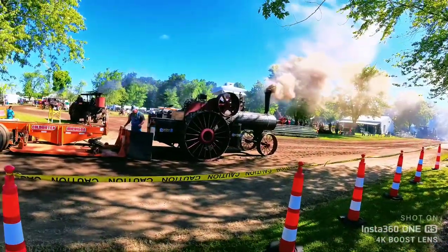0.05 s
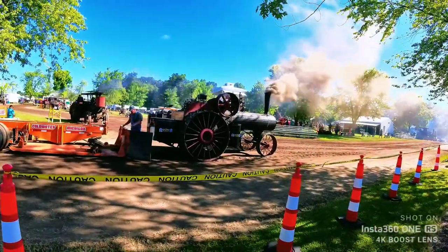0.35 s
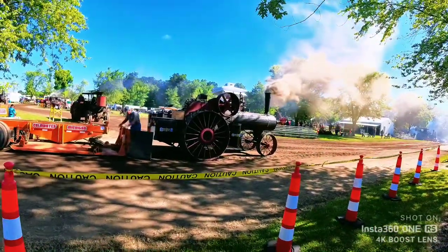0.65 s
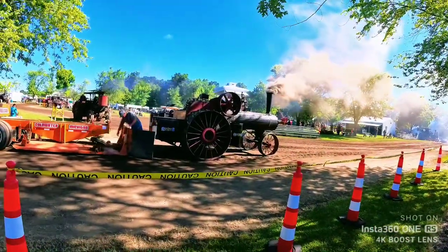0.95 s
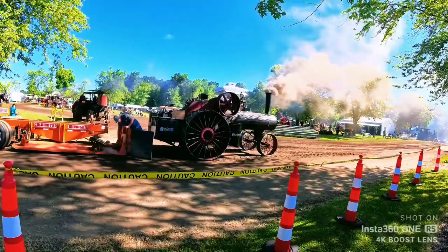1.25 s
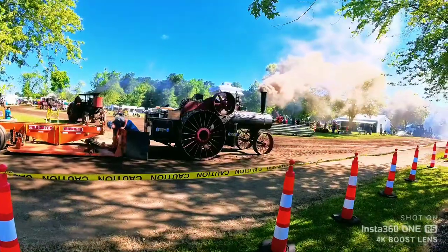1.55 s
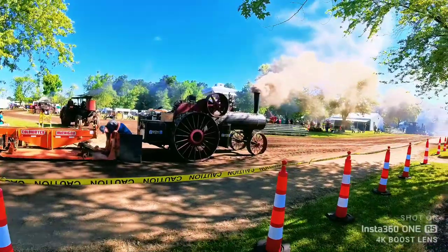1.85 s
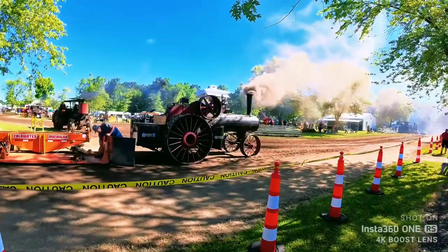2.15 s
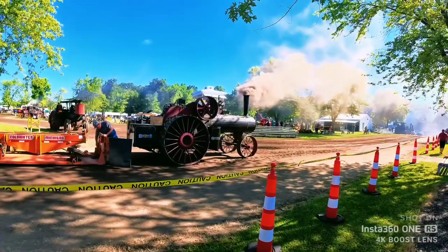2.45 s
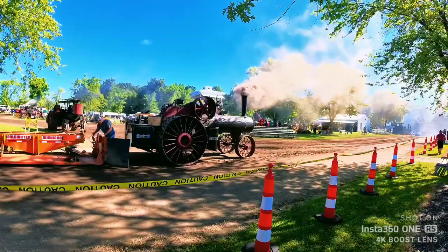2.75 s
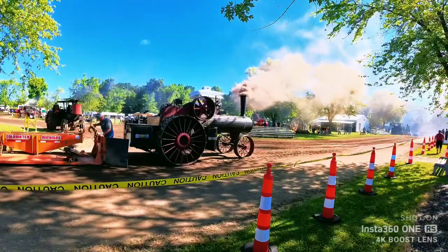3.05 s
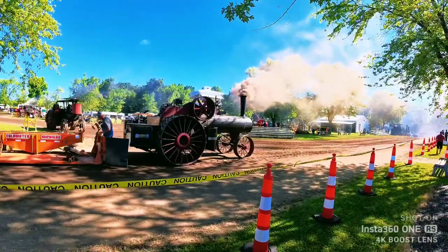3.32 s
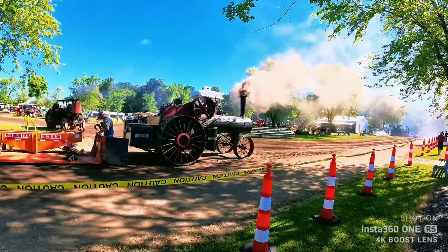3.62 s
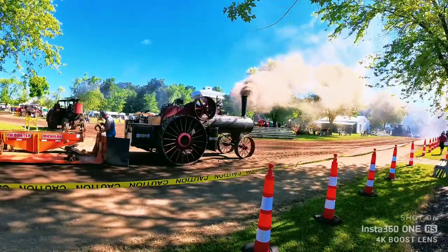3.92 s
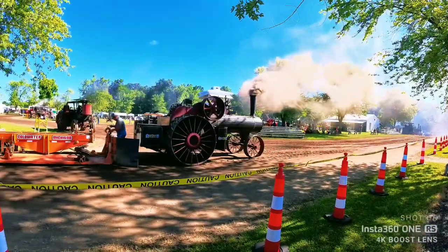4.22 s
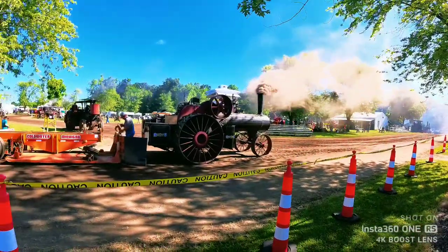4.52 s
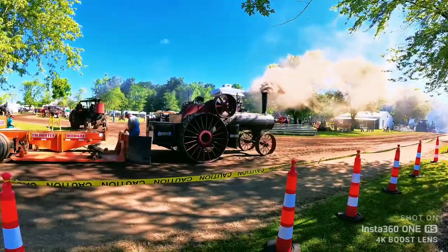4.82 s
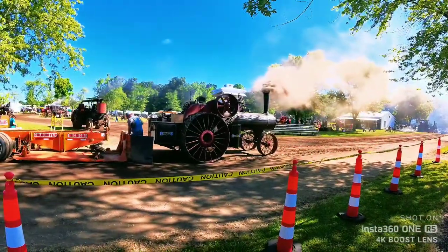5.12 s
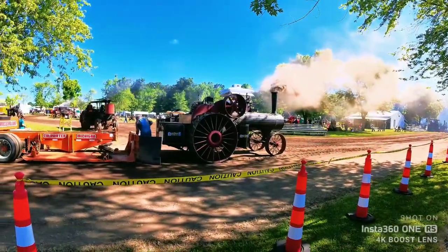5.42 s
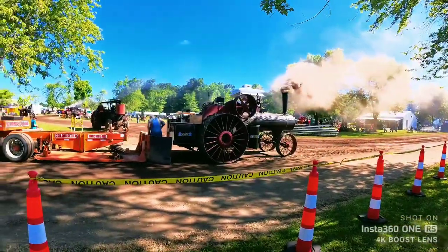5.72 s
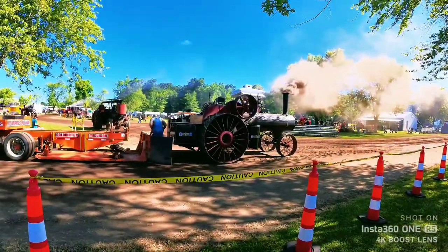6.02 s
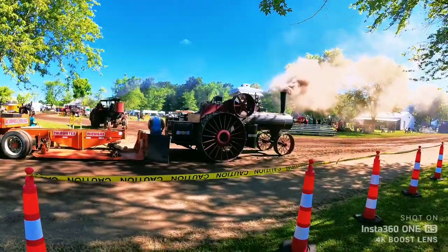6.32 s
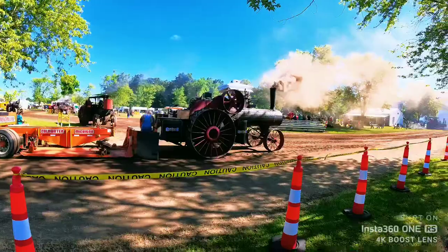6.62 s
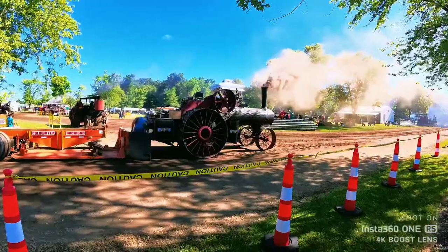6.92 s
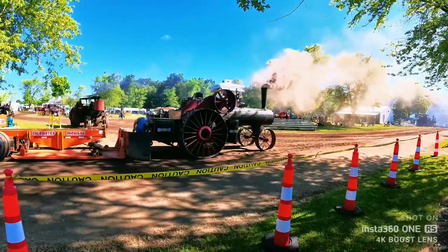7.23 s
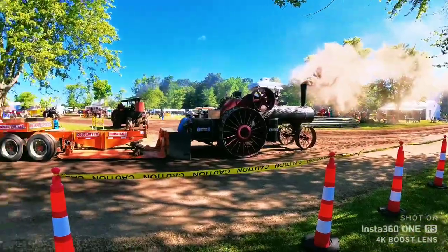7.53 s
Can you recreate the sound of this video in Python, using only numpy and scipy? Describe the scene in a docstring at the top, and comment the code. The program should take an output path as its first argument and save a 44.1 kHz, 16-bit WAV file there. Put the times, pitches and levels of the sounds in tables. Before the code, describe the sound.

A steam traction engine hauls a heavy sled across an open showground, chuffing evenly about six times a second, each beat a bark with a hiss and hollow ring. Underneath, machinery drones and the sled grinds through dirt. Midway, steam leaks thinly for a second. Brief high steel squeals and one faint clink come through, while puffs of wind buffet the stereo microphone.

```python
"""Steam exhaust beats about six times a second: a bark from the stack, a hollow ring, a hissing jet.
A traction engine is hauling a weighted sled past a stereo microphone on an open showground.
Under the beats the machinery drones and rumbles and the sled grinds through the dirt.
Midway steam leaks for a second; dry steel squeals, the hitch clinks once, and puffs of wind
buffet the microphone. Trees and sheds send back a faint echo."""
import sys
import numpy as np
from scipy import signal
from scipy.fft import irfft, next_fast_len
from scipy.io import wavfile
from scipy.ndimage import uniform_filter1d

SR = 44100
rng = np.random.default_rng(int(sys.argv[2]) if len(sys.argv) > 2 else 0)


def pcm_store(signal):
    """Save signal as 16-bit PCM."""
    levels = np.round(np.clip(np.atleast_2d(signal), -1, 1) * 32767)
    wavfile.write(sys.argv[1], SR, levels.astype(np.int16).T)


N = 338247
TIME = np.arange(N) / SR
HZ = np.fft.rfftfreq(2 * next_fast_len(N // 2 + 1, True), 1 / SR)


def gain_of(db):
    return 10 ** (np.asarray(db) / 20)


def unit_rms(x):
    return x / np.sqrt(np.mean(x ** 2) + 1e-20)


def at_time(table, time_s=TIME):
    return np.interp(time_s, *np.transpose(table))


def at_pitch(table, hz=HZ, column=1):
    """A column of a table, joined by straight lines over log frequency."""
    columns = np.transpose(table)
    return np.interp(np.log(hz + 1), np.log(columns[0] + 1), columns[column])


def resonance(pitch_hz, width_hz):
    """A spectral peak of height 1."""
    return 1 / (1 + (2 * (HZ - pitch_hz) / width_hz) ** 2)


def white_spectrum():
    return rng.standard_normal(len(HZ)) + 1j * rng.standard_normal(len(HZ))


def wander(rate_hz):
    """Random drift of rms 1, up to about the given rate."""
    return unit_rms(irfft(white_spectrum() / (1 + (HZ / rate_hz) ** 4))[:N])


def blast(start_s, rise_s, hold_s, decay_s):
    """Envelope of a rush of gas: it swells, holds until hold_s after its start, then runs out."""
    flow = np.zeros(N)
    part = slice(max(round(start_s * SR), 0), round(start_s * SR) + SR // 2)
    age = np.maximum(TIME[part] - start_s, 0)
    swell = np.sin(np.pi / 2 * np.minimum(age / rise_s, 1))
    flow[part] = swell * np.exp(-np.maximum(age - hold_s, 0) / decay_s)
    return flow


# The microphone's two ports: pitch_hz, likeness (0-1), left_lead_rad, left_over_right_db
MIC_PORTS = [(100, 0.97, -0.05, 0.26), (550, 0.93, -0.07, 0.89), (1000, 0.79, -0.5, 1.35),
             (1600, 0.75, -1.07, 2.11), (2000, 0.46, -1.29, 1.79), (2500, 0.36, -2.03, 5.09),
             (3100, 0.26, -4.03, 3.45), (3800, 0.42, -4.25, -5.89), (4600, 0.4, -4.27, -8.79),
             (5300, 0.4, -5.83, -5.6), (5900, 0.79, -6.27, -5.58), (6650, 0.79, -6.35, -8.4),
             (7200, 0.26, -6.84, -13.35), (8200, 0.07, -6.04, -19.07)]
def port_gains(hz, mono_hz=550):
    """Gain and phase at the left and right port; below a few hundred hertz the two stay in step."""
    lean = gain_of(at_pitch(MIC_PORTS, hz, column=3))
    lead = at_pitch(MIC_PORTS, hz, column=2) * hz ** 4 / (hz ** 4 + mono_hz ** 4)
    return np.array([lean * np.exp(1j * lead), np.ones_like(lean)]) * np.sqrt(2 / (1 + lean ** 2))


def stereo_noise(colour_db):
    """Turbulent noise of rms 1 as the two ports hear it."""
    likeness = np.clip(at_pitch(MIC_PORTS), 0, 1)
    left = white_spectrum()
    right = likeness * left + np.sqrt(1 - likeness ** 2) * white_spectrum()
    return unit_rms(irfft(np.array([left, right]) * port_gains(HZ) * gain_of(colour_db))[:, :N])


# Trees and sheds, farther off around the showground: pitch_hz, t60_s
ECHO_DECAY = [(200, 0.9), (1000, 0.34), (2400, 0.76), (6000, 0.61)]
def far_echoes(x, delay_s=.03):
    """Scattered late echoes, each band dying at its own speed."""
    taps = rng.standard_normal((2, SR)) * (rng.random((2, SR)) < .02) * (TIME[:SR] > delay_s)
    hz, age, bands = signal.stft(taps, SR, nperseg=256)
    decay = gain_of(-60 * age / at_pitch(ECHO_DECAY, hz)[:, None])
    tail = signal.istft(bands * decay, SR)[1]
    return signal.fftconvolve(x, tail / np.linalg.norm(tail[0]), axes=1)[:, :N]


# Boiler, canopy and ground, close around the stack: first_delay_ms, last_delay_ms, level_db
NEAR_SURFACES = [(4.2, 4.9, -26.5), (7.6, 6.8, -13), (11.5, 12.6, -15.5), (17, 15.5, -16.5)]
def with_reflections(x):
    """Short echoes comb the sound, their delays shifting as the engine rolls."""
    out = x.copy()
    for first_ms, last_ms, db in NEAR_SURFACES:
        earlier = TIME - np.linspace(first_ms, last_ms, N) / 1000
        out += gain_of(db) * np.array([np.interp(earlier, TIME, port) for port in x])
    return out


# Load on the gears and the sled: time_s, level_db
LOAD_CURVE = [(0, -2), (1.5, -2), (2.2, -.5), (3, -0.5), (3.9, 1.2), (5, 1), (5.9, 1), (6.6, -1),
              (7.6, -0.5)]
# Tones of the passing machinery: pitch_hz, level_db, waver_rad, waver_db, db_per_load_db
DRONE_TONES = [(50.5, -27.5, .22, 1, 0), (69.5, -36, .5, 2, 0), (82.2, -29.5, .4, 2.5, 0),
               (101, -37, .6, 3, 0), (281, -45, 3, 3, 1.5), (327, -44, 3.5, 3, 1), (681, -49, 3, 3, 1.5),
               (1077, -45, 2.5, 3, 2.5), (1871, -45, 3, 4, 1)]
# The low rumble under them: pitch_hz, density_db
RUMBLE_COLOUR = [(15, -27), (30, -14), (45, -8), (62, 3.5), (78, -0.5), (115, 0.5), (150, 3), (200, -5.5),
                 (300, -15), (600, -62)]
# Fire, gears and the sled in the dirt: pitch_hz, density_db
GRIND_COLOUR = [(150, -15.5), (330, -0.5), (430, -5.5), (500, -4.5), (650, -7.5), (850, 0.5), (1500, -6.5),
                (1870, -2), (2120, -10), (2400, -4.5), (3400, -13), (5800, -16.5), (7000, -23.5),
                (8500, -58.5)]
def machinery():
    """Wavering tones over a lumpy rumble and grind; the noise and upper tones swell with the load."""
    load_db = at_time(LOAD_CURVE)
    drone = np.zeros(N)
    for hz, db, waver_rad, waver_db, follow in DRONE_TONES:
        level = gain_of(db + follow * load_db + waver_db * wander(3.5))
        drone += np.sqrt(2) * level * np.sin(2 * np.pi * hz * TIME + waver_rad * wander(3.5))
    rumble = stereo_noise(at_pitch(RUMBLE_COLOUR)) * gain_of(-26 + 0.78 * load_db + 1.7 * wander(18))
    grind = stereo_noise(at_pitch(GRIND_COLOUR)) * gain_of(-25.5 + load_db + 1.1 * wander(25))
    return drone + rumble + with_reflections(grind)


# Hollow colour of air blowing across the ports: pitch_hz, width_hz, lift_db
PORT_RESONANCES = [(362, 69, 4.5), (526, 190, -6), (765, 140, 4)]
def eddy(edge_hz, low_hz=100):
    """Swirling air at the ports: dull, hollow noise below the given edge."""
    hollow_db = sum(db * resonance(hz, width) for hz, width, db in PORT_RESONANCES)
    low_cut = (HZ / low_hz) ** 2 / (1 + (HZ / low_hz) ** 2)
    high_cut = 1 / np.sqrt(1 + (HZ / edge_hz) ** 6)
    return unit_rms(irfft(white_spectrum() * low_cut * high_cut * gain_of(hollow_db))[:N])


# Puffs of wind right on the microphone: start_s, rise_s, level_db, edge_hz
WIND_PUFFS = [(1.95, 0.046, -25, 500), (2.22, 0.034, -24.5, 400), (3.185, 0.046, -16, 750),
              (3.58, .015, -24.5, 600), (4.327, 0.013, -14, 770), (4.56, .022, -18, 700),
              (4.86, 0.049, -29, 553), (5.23, 0.047, -17, 850), (5.595, .0067, -12.5, 880),
              (5.769, 0.015, -11, 715), (6.09, 0.022, -20.5, 700)]
def wind():
    """Each eddy strikes, dies quickly and leaves a softer, duller, longer wake."""
    out = np.zeros(N)
    for start_s, rise_s, db, edge_hz in WIND_PUFFS:
        strike = blast(start_s, rise_s, hold_s=rise_s, decay_s=0.031) * eddy(edge_hz)
        wake = blast(start_s + 0.023, rise_s, hold_s=rise_s, decay_s=0.087) * eddy(edge_hz * 0.34)
        out += gain_of(db) * (strike + gain_of(-3) * wake)
    return out * gain_of([[.3], [-.3]])  # nearly alike in both ports


# Steam leaking from the engine: time_s, level_db
LEAK_LEVEL = [(0, -64), (3.58, -52.5), (3.68, -30.5), (4.0, -27), (4.4, -27), (4.76, -27), (4.88, -42),
              (7.7, -69.5)]
# Its colour at the microphone: pitch_hz, density_db
LEAK_HISS = [(2000, -17), (4000, -7), (5500, -2.5), (6450, -2), (7200, -10), (8200, -16), (9000, -37)]
def steam_leak(flutter_db=2.0):
    """Escaping steam makes a thin, fluttering hiss."""
    return stereo_noise(at_pitch(LEAK_HISS)) * gain_of(at_time(LEAK_LEVEL) + flutter_db * wander(40))


# A snatch at the hitch, between engine and sled: start_s, level_db
HITCH_BLOWS = [(2.636, -9)]
# Modes of the link: pitch_hz, level_db, t60_s
HITCH_MODES = [(5200, -10, .015), (6072, 0, .1), (6140, -8, .12), (6750, -11, .12)]
def hitch_clink(rise_s=.001):
    """A link of the hitch snaps tight and rings."""
    out = np.zeros((2, N))
    for start_s, blow_db in HITCH_BLOWS:
        age = np.maximum(TIME - start_s, 0)
        for hz, db, t60_s in HITCH_MODES:
            envelope = np.minimum(age / rise_s, 1) * gain_of(blow_db + db - 60 * age / t60_s)
            ring = envelope * np.exp(2j * np.pi * hz * age)
            out += (port_gains(hz)[:, None] * ring).imag
    return out


# Dry steel slipping as the rig passes: start_s, length_s, level_db, lowest_hz, highest_hz, fade_share
STEEL_SLIPS = [(2.43, .05, -9.5, 6500, 6700, .8), (3.17, .14, 4.5, 4500, 5000, .6),
               (5.28, .05, 6, 6300, 6500, .8), (5.295, .085, 4.5, 4500, 5000, .7),
               (5.3, .06, -5, 6000, 6300, .8), (5.6, .1, -1.5, 4500, 5000, .6),
               (6.605, .21, 0, 1800, 5000, .5), (6.658, .315, 0, 6000, 7200, .3),
               (6.72, .095, 7, 1800, 2000, .9), (6.732, .078, 6, 6000, 6300, .3)]
# Modes of the rubbing steel: pitch_hz, width_hz, level_db
STEEL_MODES = [(1872, 9, -28.5), (4187, 22, -32), (4875, 36, -37), (6148, 85, -31), (6420, 110, -40),
               (6622, 65, -28.5), (6745, 100, -32), (7060, 220, -38)]
def steel_squeals(flutter_db=2.5, level_db=4.2):
    """Steel slips on steel, and the modes within each slip's range sing in rough, narrow tones."""
    out = np.zeros((2, N))
    slip, grip = wander(200), wander(70)
    for start_s, length_s, squeal_db, lowest_hz, highest_hz, fade_share in STEEL_SLIPS:
        part = slice(round(start_s * SR), round((start_s + length_s) * SR))
        for hz, width_hz, db in STEEL_MODES:
            if lowest_hz <= hz <= highest_hz:
                shift = rng.integers(N)  # each mode wavers in its own way
                pitch_hz = hz + width_hz / 2 * np.roll(slip, shift)[part]
                level = gain_of(level_db + squeal_db + db + flutter_db * np.roll(grip, shift)[part])
                envelope = level * signal.windows.tukey(len(pitch_hz), fade_share)
                tone = envelope * np.exp(2j * np.pi * np.cumsum(pitch_hz) / SR)
                out[:, part] += np.sqrt(2) * (port_gains(hz)[:, None] * tone).real
    return out


def crank_beats(first_s=-.053, turn_s=.3191, return_s=0.1542):
    """Two beats to each turn of the governed crank: start_s, stroke (0 forward, 1 return)."""
    sag_at_s, sag_lag_s, sag_spread_s = 4.05, 0.0054, 0.22  # the crank lags; the governor catches up
    for turn_start_s in np.arange(first_s, N / SR, turn_s):
        for stroke in (0, 1):
            due_s = turn_start_s + stroke * return_s
            yield due_s + sag_lag_s * np.exp(-((due_s - sag_at_s) / sag_spread_s) ** 2), stroke


def puffs(level_curve, shapes, return_db, scatter_db):
    """One blast a beat, summed in power; shapes holds the forward and the return stroke's timing."""
    power = np.zeros(N)
    for start_s, stroke in crank_beats():
        db = at_time(level_curve, start_s) + stroke * return_db + scatter_db * rng.standard_normal()
        power += (gain_of(db) * blast(start_s, **shapes[stroke])) ** 2
    return np.sqrt(power)


# Ringing modes of the stack: pitch_hz, width_hz, level_db
STACK_MODES = [(2345, 80, 0), (2410, 80, 0), (2510, 90, -6)]
# The ring as heard from the microphone's spot: time_s, level_db
RING_CURVE = [(0, -28.5), (1.9, -20), (3.85, -25.5), (4.8, -19.5), (7.6, -24)]
def stack_ring():
    """Each jet makes the stack ring with a hollow note."""
    shape = dict(rise_s=0.028, hold_s=0.063, decay_s=0.034)
    flow = puffs(RING_CURVE, (shape, shape), return_db=-0.2, scatter_db=0.9)
    modes = sum(gain_of(db) * resonance(hz, width) for hz, width, db in STACK_MODES)
    return flow * stereo_noise(20 * np.log10(modes)) * gain_of(-.5 + wander(30))


# The jet at the mouth of the stack: pitch_hz, density_db
JET_COLOUR = [(500, -31.5), (1000, -14.5), (1800, 1.5), (2120, -3), (2700, 1), (3450, -3), (4600, 2),
              (6050, -2.5), (6550, -7.5), (7100, -11), (7900, -19), (8700, -34), (9300, -65.5)]
# Stack resonances that the jet excites: pitch_hz, width_hz, lift_db
STACK_RESONANCES = [(3106, 360, 7.5), (3760, 200, 8.5), (5280, 170, 4)]
# The jet as heard from the microphone's spot: time_s, level_db
JET_CURVE = [(0, -21), (2.0, -19.5), (2.5, -17.5), (4.0, -18.7), (4.6, -21), (5.3, -20), (6.0, -17.5),
             (7.6, -19.5)]
def steam_jet(drift=.012, swap_hz=7):
    """Steam hisses up the stack, whose resonances shift as hot and cool gas pass in turn."""
    shapes = [dict(rise_s=0.02, hold_s=hold_s, decay_s=0.046) for hold_s in (0.05, 0.051)]
    flow = puffs(JET_CURVE, shapes, return_db=-0.15, scatter_db=0.53)
    blend_rad = wander(swap_hz) + np.pi / 4
    hiss = np.zeros((2, N))
    for stretch, share in ((1 - drift, np.cos(blend_rad)), (1 + drift, np.sin(blend_rad))):
        stack_db = sum(db * resonance(hz * stretch, width) for hz, width, db in STACK_RESONANCES)
        hiss += share * stereo_noise(at_pitch(JET_COLOUR) + stack_db)
    return flow * hiss * gain_of(3 + 1.2 * wander(110))


# The deep and the sharp part of the bark at the stack: pitch_hz, density_db
DEEP_COLOUR = [(100, -12), (300, -1), (540, -4.5), (790, 3), (1050, 6.5), (1350, -2.5), (2000, -50)]
SHARP_COLOUR = [(700, -19), (1000, -10.5), (1300, 2), (1850, 0), (2120, -6.5), (2600, -5), (3400, -23.5),
                (6000, -9.5), (8000, -46.5)]
# Both from the microphone's spot, the sharp part dying away as the engine goes by: time_s, level_db
DEEP_CURVE = [(0, -22), (2.1, -27), (2.7, -24), (5.4, -25), (6.3, -27), (7.6, -26)]
SHARP_CURVE = [(0, -18.5), (1.6, -19.5), (3.2, -24.5), (3.9, -21), (5.05, -21), (5.9, -29.5), (7.6, -31)]
def exhaust_bark():
    """Each end of the cylinder empties up the stack in turn, one more softly than the other."""
    shapes = (dict(rise_s=0.0059, hold_s=0.019, decay_s=0.059),
              dict(rise_s=0.01, hold_s=0.02, decay_s=0.062))
    deep_flow = puffs(DEEP_CURVE, shapes, return_db=-2, scatter_db=0.91)
    sharp_flow = puffs(SHARP_CURVE, shapes, return_db=-0.7, scatter_db=1.3)
    deep = deep_flow * stereo_noise(at_pitch(DEEP_COLOUR))
    sharp = sharp_flow * stereo_noise(at_pitch(SHARP_COLOUR))
    return (deep + sharp) * gain_of(2 + 1.3 * wander(150))  # eddies roughen the bark


def scene():
    """The engine and its echo across the showground, with wind at the microphone."""
    exhaust = with_reflections(exhaust_bark() + stack_ring() + steam_jet())
    engine = exhaust + steel_squeals() + hitch_clink()
    return engine + gain_of(-19) * far_echoes(engine) + machinery() + steam_leak() + wind()


def record(dry, threshold_db=-19, squeeze=0.18, recovery_db_per_s=70, ceiling=.92, edge_hz=9135):
    """Gain control ducks everything under loud beats; peaks round off; the top treble is cut."""
    power_db = 10 * np.log10(abs(uniform_filter1d((dry ** 2).mean(0), size=300)) + 1e-12)
    fall_db = TIME * recovery_db_per_s
    held_db = np.maximum.accumulate(power_db + fall_db) - fall_db
    over_db = np.maximum(held_db - threshold_db, 0)
    ducked = dry / gain_of(squeeze * uniform_filter1d(over_db, size=200))
    rounded = ducked / (1 + (ducked / ceiling) ** 12) ** (1 / 12)
    low_pass = signal.firwin(511, edge_hz, window=("kaiser", 9), fs=SR)
    return signal.oaconvolve(rounded, low_pass[None], "same")


dry = scene()
out = record(dry)
pcm_store(out)
```